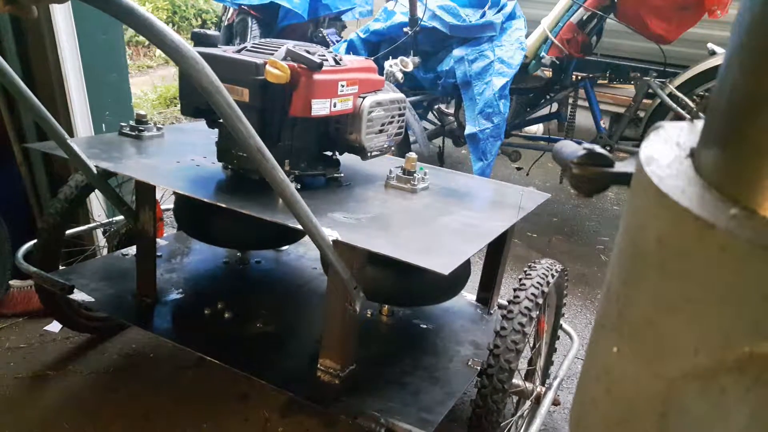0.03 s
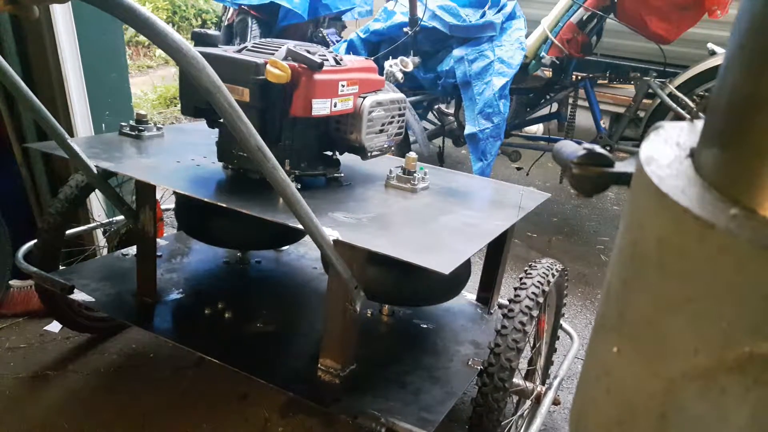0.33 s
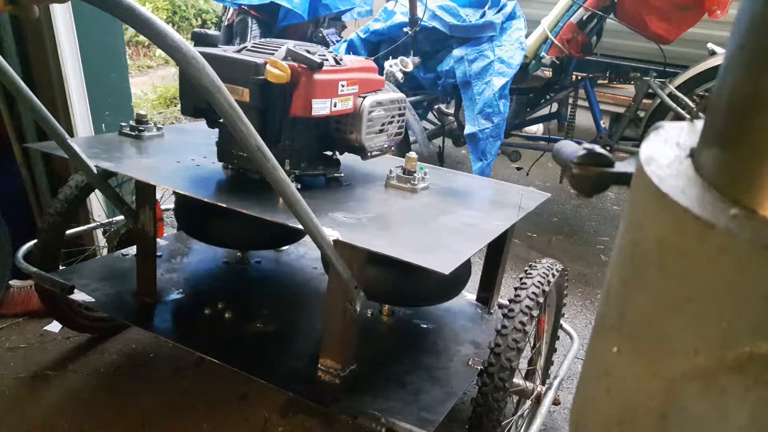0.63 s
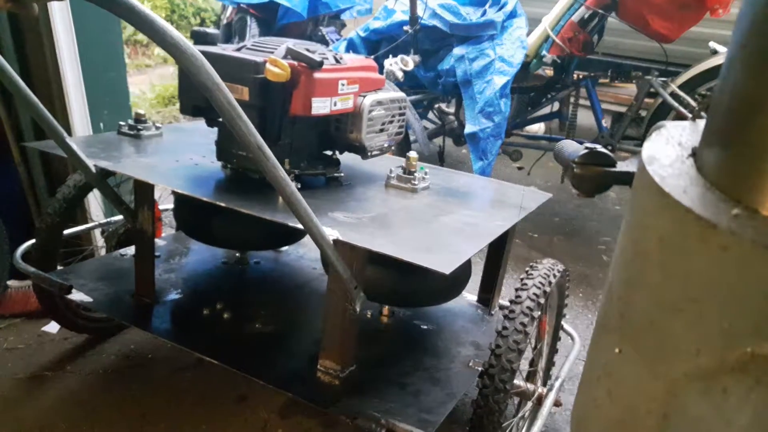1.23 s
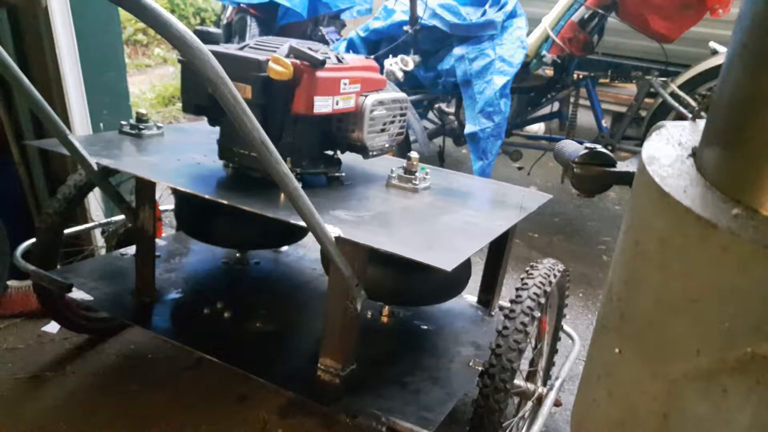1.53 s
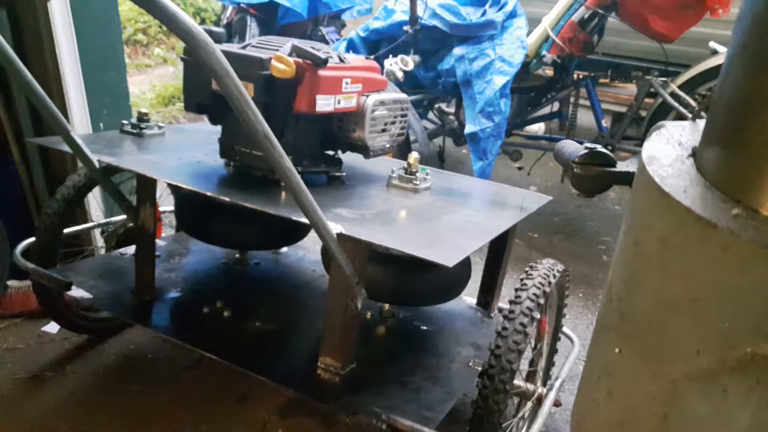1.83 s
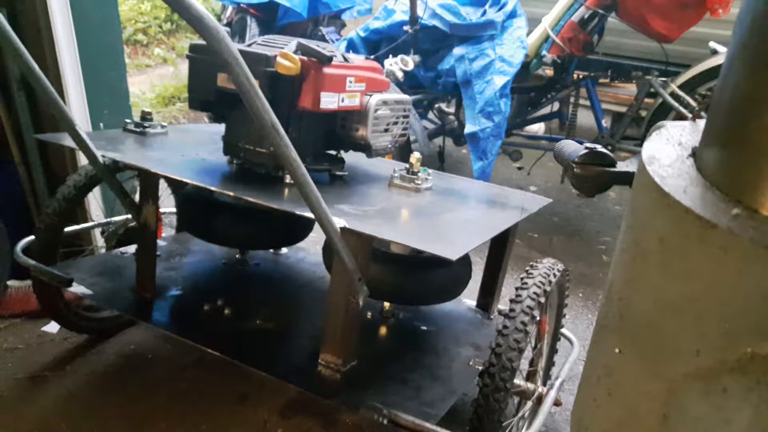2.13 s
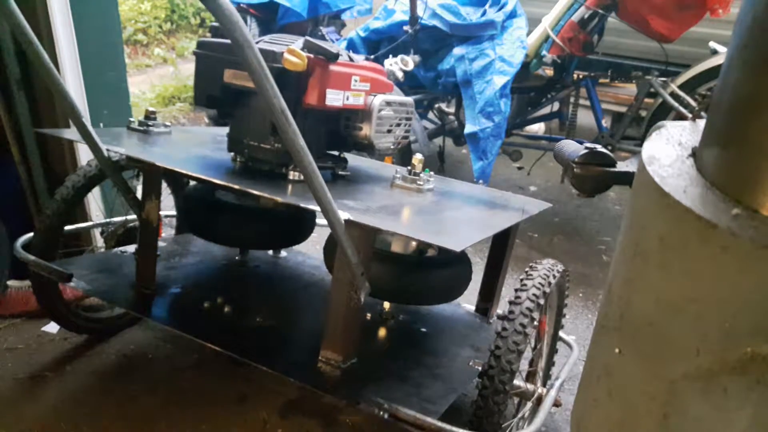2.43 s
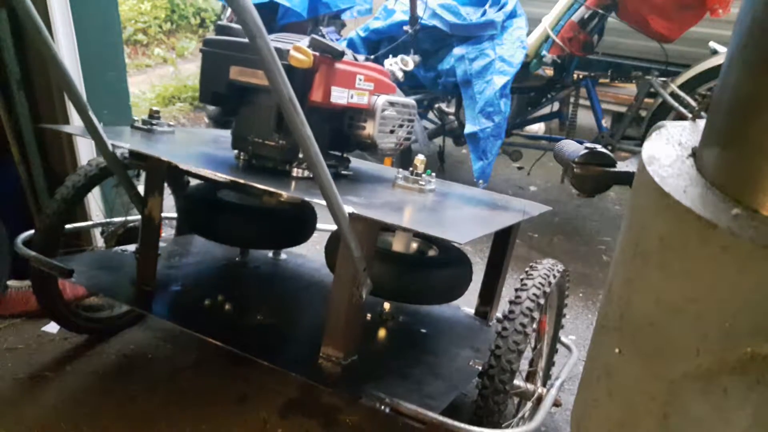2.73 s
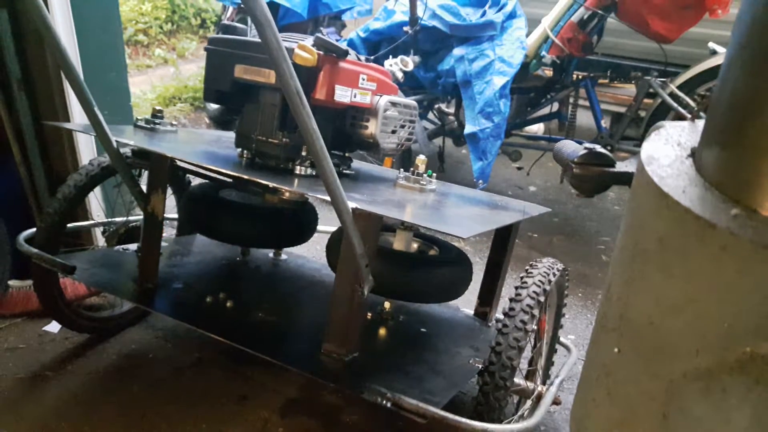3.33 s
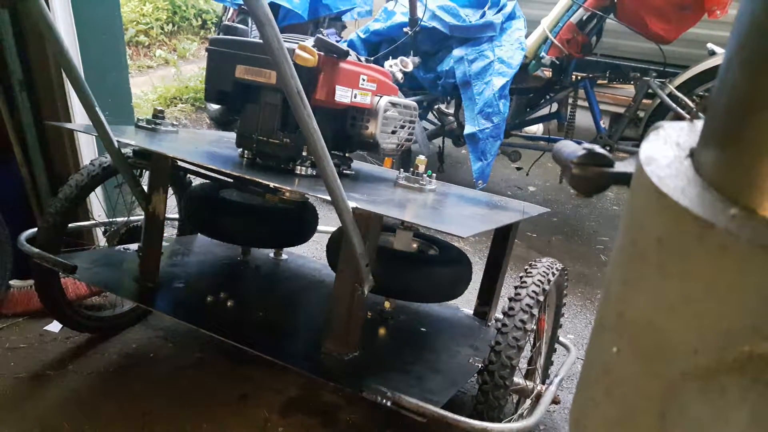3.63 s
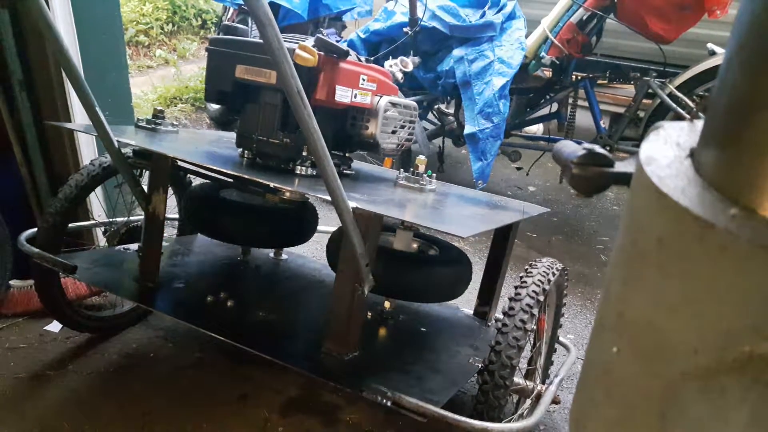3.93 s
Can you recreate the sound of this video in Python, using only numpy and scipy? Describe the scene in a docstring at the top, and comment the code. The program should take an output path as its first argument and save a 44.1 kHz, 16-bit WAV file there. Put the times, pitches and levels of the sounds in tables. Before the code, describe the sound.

A small petrol engine runs down in a shed, with ever slower hollow gulps and thumps that rattle a steel cart and jingle loose washers. It stops with a last gulp at about 1.6 seconds. Coasting wheels whirr softly and fade, brushing lightly around 2 seconds. Near 3 seconds the cart shifts with a double clunk. Quiet low background noise and faint ticks continue until 4 seconds.

```python
"""A small single-cylinder petrol engine on a steel cart runs down in a cluttered shed, ignition off.
Each ever slower cycle gulps air with a hollow note, thumps and shakes the deck while loose washers jingle.
The piston rocks back with a last gulp at 1.6 s, and the driven wheels whirr on and fade.
Near 3 s the cart shifts with a double clunk. A quiet background and faint ticks lie under it all."""
import sys
import numpy as np
from scipy import signal
from scipy.fft import rfft, irfft
from scipy.io import wavfile
from scipy.ndimage import uniform_filter1d

SR = 44100
rng = np.random.default_rng(int(sys.argv[2]) if len(sys.argv) > 2 else 0)


def to_wav(s):
    """Save 16-bit WAV."""
    ch = np.atleast_2d(s).T  # columns
    pcm = np.round(np.clip(ch, -1, 1) * 32767)  # PCM
    wavfile.write(sys.argv[1], SR, pcm.astype(np.int16))


N = 176400
T = np.arange(N) / SR


def gulps():
    """Each pumping stroke of the piston rings the intake and silencer with a hollow note."""
    # strokes: start_s, level_db, pitch_hz, hold_s
    strokes = [(.015, -33, 187, 0.03), (0.108, -24, 236.5, 0.013), (0.172, -30, 231, 0.034),
               (.253, -20.5, 232, 0.0052), (0.331, -27, 234, 0.0051), (0.406, -20, 238, 0.0033),
               (0.491, -28, 241, 0.0062), (.576, -22, 222, 0.0027), (0.67, -29.5, 236, 0.0074),
               (0.768, -21.5, 237.6, 0.0074), (.880, -26, 240, 0.0033), (0.997, -24.5, 233, 0.015),
               (1.141, -28, 236, 0.0062), (1.329, -24.5, 236.4, 0.0037), (1.633, -30, 243.7, 0.013)]
    attack_s, octave_db = .006, -22.5
    out, age = np.zeros(N), T[:SR // 4]
    for start_s, level_db, pitch_hz, hold_s in strokes:
        fade_s = .012 * (1 + .32 * start_s ** 2)  # the ring lengthens as the engine slows
        envelope = np.minimum(age / attack_s, 1) * np.exp(-np.maximum(age - attack_s - hold_s, 0) / fade_s)
        phase = 2 * np.pi * pitch_hz * age
        note = np.sin(phase) + from_db(octave_db) * np.sin(2 * phase)
        add(out, start_s, from_db(level_db) * envelope * note)
    return out


def thumps():
    """The cylinder's pressure swings in low, heavily damped thumps."""
    # pressure pulses: start_s, level_db
    pulses = [(.008, -32), (0.095, -26.5), (0.144, -35), (.237, -27.5), (0.252, -28), (0.294, -35),
              (.358, -27), (0.4, -32.5), (0.521, -26), (0.572, -34), (0.704, -28), (0.77, -35), (.922, -28),
              (0.999, -37), (1.209, -33.5), (1.326, -41)]
    pitch_hz = 101
    out, envelope = np.zeros(N), swell(rise_s=.0073)
    thump = envelope * np.sin(2 * np.pi * pitch_hz * T[:len(envelope)])
    for start_s, level_db in pulses:
        add(out, start_s, from_db(level_db) * thump)
    return out


def deck():
    """Bright clatters, dull knocks and a running rattle ring the steel deck."""
    # deck resonances: pitch_hz, level_db
    modes = [(177, 0), (340, -4), (388, -3), (465, -1), (580, -6), (745, 0), (775, -2), (850, -3),
             (990, -6), (1205, -4), (1479, -5), (1775, -11), (2061, -9), (3050, -17), (3420, -17),
             (3950, -15), (5580, -20)]
    # the drive's slack is taken up: start_s, level_db
    clatters = [(.143, -51), (.208, -57), (.277, -40.5), (.296, -40), (.325, -37.5), (.352, -32.5),
                (.385, -50), (.509, -37.5), (.516, -36), (.633, -44), (.668, -49), (.692, -37.5),
                (.701, -38), (.742, -44.5), (.850, -49), (.882, -45), (.911, -40.5), (.921, -37),
                (.955, -45.5), (1.197, -40)]
    # the engine knocks on its mount: start_s, level_db
    knocks = [(.003, -31.5), (.075, -41), (.136, -37.5), (.445, -43), (.487, -36.5), (.670, -40),
              (.745, -41.5), (.850, -40), (.882, -40.5), (.975, -37.5), (1.075, -49), (1.284, -40),
              (1.490, -46.5), (1.632, -55)]
    # the running gear rattles: time_s, level_db
    rattle_curve = [(0, -30.5), (.2, -35.5), (.45, -32.5), (.62, -40), (.8, -39), (.98, -48.5),
                    (1.08, -43.5), (1.3, -48), (1.5, -55), (1.62, -60), (1.9, -59), (2.1, -100)]
    # tone colour of each: frequency_hz, level_db
    clatter_colour = [(30, -39), (100, -11), (200, -2), (450, 0.5), (850, 4), (1400, 2), (2200, -5),
                      (4000, -4.5), (5200, -21.5), (8000, -13.5), (12000, -15.5), (16000, -27)]
    knock_colour = [(30, -42), (100, -24), (250, -1.5), (460, -4), (760, 1), (1200, -13), (1700, -16.5),
                    (2500, -25), (6000, -47), (16000, -47)]
    rattle_colour = [(40, -24), (80, -8), (120, -19), (150, -7.5), (180, 20), (260, 13), (380, 0.5),
                     (440, -12), (760, 7), (1300, -17), (2200, -17.5), (4000, -18.5), (5200, -36),
                     (7000, -31), (12000, -28), (16000, -47)]
    clatter = excite(bursts(clatters, rise_s=.0027, per_s=3900),
                     body(clatter_colour, modes, wash_t60=.16, ring_t60=.32, ring_db=-8.5))
    knock = excite(bursts(knocks, rise_s=.0035, per_s=3000),
                   body(knock_colour, modes, wash_t60=.13, ring_t60=.2, ring_db=-6))
    rattle = excite(contacts(per_s=700) * level(rattle_curve),
                    body(rattle_colour, modes, wash_t60=.039, ring_t60=.19, ring_db=-8.5))
    return clatter + knock + rattle


def washers():
    """Thin steel washers chatter briefly and ring very high, over a dry sizzle of loose hardware."""
    # washer resonances: pitch_hz, level_db
    modes = [(5580, -9), (5750, -10), (7607, -11), (8036, -5), (8864, -6), (8974, -9), (9126, -2),
             (9420, -2), (10210, -8), (10600, -8), (11443, -1), (12660, -4), (13300, -3), (14194, -5),
             (14250, -4), (15270, -7)]
    # washers jump on their bolts: start_s, level_db
    jumps = [(.004, -43.5), (.050, -41.5), (.077, -38.5), (.110, -38), (.145, -33), (.177, -39),
             (.210, -37.5), (.273, -37.5), (.292, -33.5), (.308, -35.5), (.338, -43), (.351, -32),
             (.381, -34), (.413, -34), (.447, -39.5), (.486, -44), (.509, -35), (.555, -44), (.600, -48),
             (.636, -42.5), (.668, -50), (.692, -39.5), (.742, -44), (.774, -49), (.815, -40), (.850, -38),
             (.911, -39), (.956, -46.5), (.983, -46), (1.095, -62), (1.149, -53), (1.175, -50),
             (1.193, -50.5), (1.230, -65), (1.360, -53), (1.392, -54), (1.432, -50.5), (1.468, -47.5),
             (1.532, -56), (1.735, -61.5), (1.770, -62), (1.840, -80), (1.875, -70), (2.545, -88),
             (2.955, -65), (3.375, -79), (3.455, -74)]
    # hardware sizzles on the deck: time_s, level_db
    sizzle_curve = [(0, -49.5), (.45, -58), (.8, -55.5), (1.0, -55.5), (1.1, -61.5), (1.25, -57.5),
                    (1.35, -63), (1.5, -58), (1.6, -66.5), (1.7, -71.5), (1.85, -70.5), (2.0, -79)]
    # tone colour of each: frequency_hz, level_db
    jingle_colour = [(500, -53), (2000, -3), (4000, -4), (6500, -7.5), (8200, 5), (11000, 2), (13000, 10),
                     (15000, 5.5), (16500, 2.5)]
    sizzle_colour = [(1000, -8), (2500, 0), (4000, 1), (5000, -6), (5700, -4), (7000, -8), (9300, -1),
                     (11000, -4), (14200, -1), (16000, -8)]
    jingle = excite(bursts(jumps, rise_s=.0011, per_s=7000),
                    body(jingle_colour, modes, wash_t60=.12, ring_t60=.15, ring_db=-6))
    sizzle = excite(contacts(per_s=2000) * level(sizzle_curve),
                    body(sizzle_colour, modes, wash_t60=.1, ring_t60=.16, ring_db=-13))
    return jingle + sizzle


def wheels():
    """The coasting wheels whirr with a slight flutter and now and then brush each other."""
    # fading whirr: time_s, level_db
    whirr_curve = [(0, -41.5), (1.2, -53.5), (1.6, -55), (1.9, -54.5), (2.05, -52), (2.35, -55),
                   (2.65, -61), (3.0, -57.5), (3.3, -62.5), (3.65, -65), (4, -72)]
    # light brushes: start_s, level_db
    rubs = [(1.751, -48), (1.796, -56), (1.838, -58), (1.932, -49.5), (1.993, -48), (2.54, -57)]
    # tone colour of each: frequency_hz, level_db
    whirr_colour = [(100, -3.5), (250, 1.5), (420, -8.5), (520, 9), (620, -1), (800, 0), (1050, 3),
                    (1550, 2), (1750, -9), (2300, -15.5), (3000, -23.5), (4500, -29), (7000, -39),
                    (16000, -74)]
    rub_colour = [(200, -13), (600, -8), (1300, 5.5), (1600, 1.5), (2200, -16), (5000, -32), (16000, -51)]
    flutter_hz, flutter_db = 25.8, 1.5
    flutter = noise([(1, -6), (flutter_hz, 0), (150, -12), (400, -60)])
    whirr = level(whirr_curve) * noise(whirr_colour) * from_db(flutter_db * flutter)
    rub_envelope = np.zeros(N)
    for start_s, level_db in rubs:
        add(rub_envelope, start_s, from_db(level_db) * swell(rise_s=.0056))
    return whirr + rub_envelope * noise(rub_colour)


def clunks():
    """The cart's frame scrapes and knocks as it settles; the softer contacts are duller."""
    # shifts of the cart: start_s, level_db, low_cut_hz, high_cut_hz
    shifts = [(2.871, -36, 470, 1060), (2.886, -40.5, 120, 910), (2.97, -31, 153, 14000),
              (2.984, -32.5, 129, 12000), (2.997, -43, 132, 4940), (3.028, -44, 129, 3000),
              (3.061, -44.5, 100, 1210), (3.127, -51, 151, 1970), (3.363, -42, 100, 654)]
    # frame resonances: pitch_hz, level_db
    modes = [(170, -8), (242, -7), (298, -8), (372, -4), (404, 2), (472, -6), (836, -1), (902, -6),
             (1222, -13), (1415, -6), (1730, -12), (1930, -12), (2000, -8), (2143, -11), (2207, -13),
             (3017, -13), (3548, -19), (4081, -20)]
    # clunk colour: frequency_hz, level_db
    colour = [(80, -19), (170, 2.5), (250, 7), (420, -4.5), (570, -9.5), (850, -2.5), (1100, -16),
              (1900, -13), (2600, -18), (4800, -16), (5700, -36), (7200, -35), (9400, -20), (11500, -32),
              (14000, -23), (16000, -23)]
    force = np.zeros(N)
    for start_s, level_db, low_hz, high_hz in shifts:
        band = signal.butter(2, [low_hz, high_hz], "band", fs=SR, output="sos")
        force += signal.sosfilt(band, bursts([(start_s, level_db)], rise_s=.0055, per_s=4900))
    return excite(force, body(colour, modes, wash_t60=.31, ring_t60=.21, ring_db=1.5))


def ticks():
    """Faint, evenly spaced ticks of electrical interference run throughout."""
    align_s, period_s, width_s, pitch_hz = 1.5942, .1024, .00035, 4700
    offset = (T - align_s + period_s / 2) % period_s - period_s / 2  # from the nearest tick
    return from_db(-62) * np.exp(-(offset / width_s) ** 2) * np.cos(2 * np.pi * pitch_hz * offset)


def background():
    """A quiet bed of low noise sinks as the engine stops and swells briefly near the end."""
    # bed loudness: time_s, level_db
    curve = [(0, -44), (2.0, -58), (2.7, -59), (3.3, -54), (4, -59.5)]
    # bed colour: frequency_hz, level_db
    colour = [(20, -19), (50, -2.5), (90, 0.5), (125, 7.5), (170, -1), (300, -3.5), (600, -10.5),
              (1200, -12.5), (2000, -28), (4500, -32), (6500, -41.5), (10500, -41.5), (13500, -33.5),
              (16000, -39)]
    return level(curve) * noise(colour)


def body(colour, modes, wash_t60, ring_t60, ring_db):
    """A struck part in the shed: a sharp crack, a dying wash and clear modes. Decay times in seconds."""
    t = T[:SR]
    crack = .51 * np.exp(-t / .006)  # the direct sound stands out from the shed's wash
    echoes = rfft(rng.standard_normal(SR) * (from_db(-60 * t / wash_t60) + crack))
    flattened = irfft(echoes / np.sqrt(uniform_filter1d(np.abs(echoes) ** 2, size=70)), SR)
    wash = unit(tint(flattened, colour) * np.minimum(t / .001, 1) * (t < .5))
    tones = sum(from_db(db) * np.sin(2 * np.pi * (hz * t + rng.random())) for hz, db in modes)
    ring = unit(tones * from_db(-60 * t / ring_t60) * np.minimum(t / .002, 1))
    return unit(wash + from_db(ring_db) * ring)


def bursts(blows, rise_s, per_s):
    """Each blow is a flurry of impacts; its level is the rms of its energy spread over 20 ms."""
    out, envelope = np.zeros(N), swell(rise_s)
    grains = contacts(per_s)
    for start_s, level_db in blows:
        flurry = np.roll(grains, -int(start_s * SR))[:len(envelope)] * envelope
        add(out, start_s, from_db(level_db) * unit(flurry))
    return out * np.sqrt(.02 * SR)


def contacts(per_s):
    """Random small impacts of uneven size, rms one."""
    return unit((rng.random(N) < per_s / SR) * rng.standard_normal(N)) * np.sqrt(N)


def swell(rise_s):
    """Short envelope that reaches one after the rise time, then dies away."""
    age = T[:SR // 5] / rise_s
    return age * np.exp(1 - age)


def excite(force, response):
    """Play a force through a response."""
    return signal.fftconvolve(force, response)[:N]


def noise(colour):
    """Coloured noise, rms one."""
    return tint(rng.standard_normal(N), colour) * np.sqrt(N)


def tint(x, colour):
    """Shape a spectrum by (frequency_hz, level_db) points, at an energy of one."""
    hz, db = np.transpose(colour)
    bins_hz = np.maximum(np.arange(len(x) // 2 + 1) * SR / len(x), 1)
    gain = from_db(np.interp(np.log(bins_hz), np.log(hz), db))
    return unit(irfft(rfft(x) * gain, len(x)))


def level(curve):
    """Gain over time from (time_s, level_db) points."""
    return from_db(np.interp(T, *np.transpose(curve)))


def from_db(db):
    """Decibels to gain."""
    return 10 ** (np.asarray(db) / 20)


def unit(x):
    """Scale to an energy of one."""
    return x / np.sqrt(np.sum(x ** 2) + 1e-20)


def add(out, start_s, x):
    """Mix a short sound in at its start time."""
    i = int(np.clip(start_s * SR, 0, N - 1))
    out[i:i + len(x)] += x[:N - i]


def scene():
    """Engine, cart and background together, in mono."""
    return (gulps() + thumps() + deck() + washers() + wheels() + clunks() + ticks() + background())[None]


def record(dry):
    """The microphone drops the deep bass; the top is cut steeply."""
    low_cut_hz, high_cut_hz = 50, 15950
    thinned = signal.sosfilt(signal.butter(2, low_cut_hz, "high", fs=SR, output="sos"), dry)
    return signal.sosfilt(signal.ellip(10, .2, 80, high_cut_hz, fs=SR, output="sos"), thinned)


dry = scene()
out = record(dry)
to_wav(out)
```